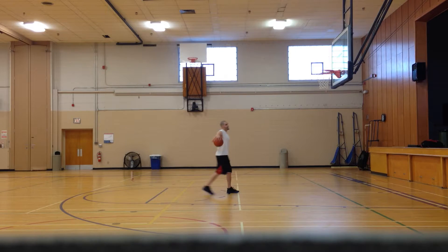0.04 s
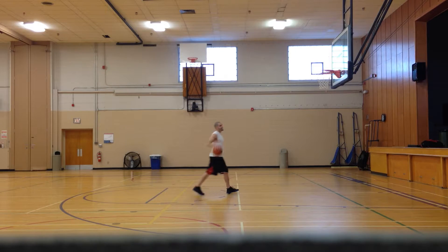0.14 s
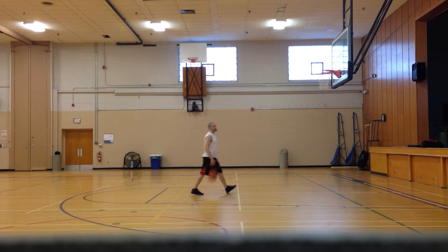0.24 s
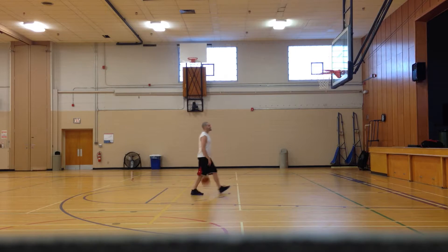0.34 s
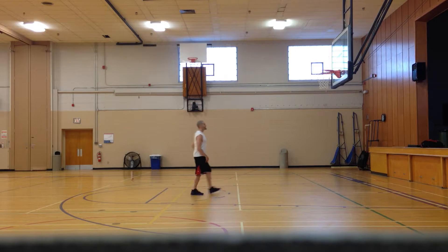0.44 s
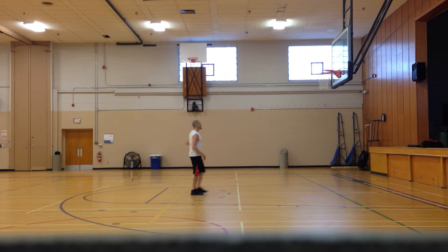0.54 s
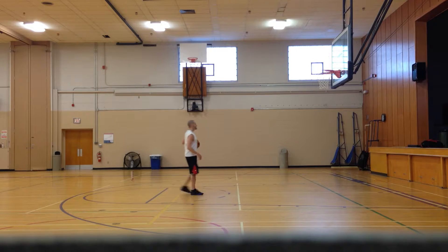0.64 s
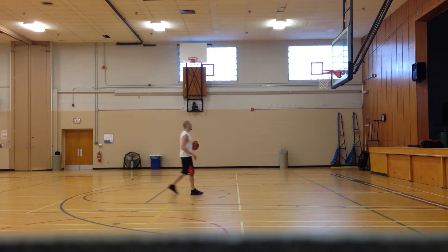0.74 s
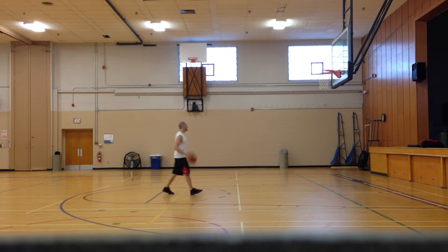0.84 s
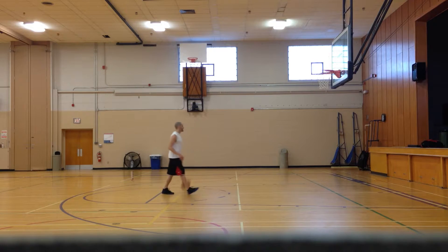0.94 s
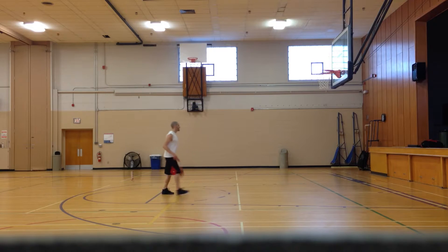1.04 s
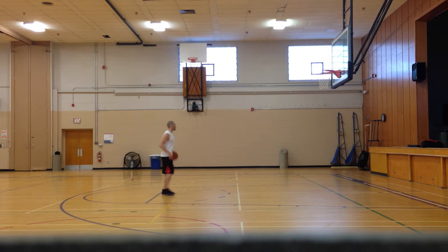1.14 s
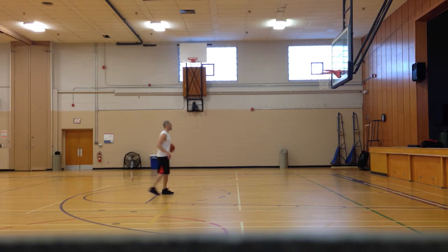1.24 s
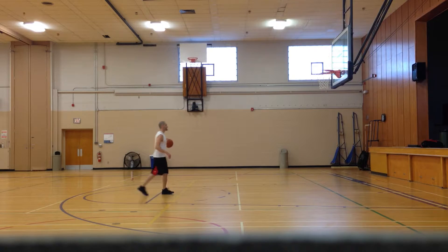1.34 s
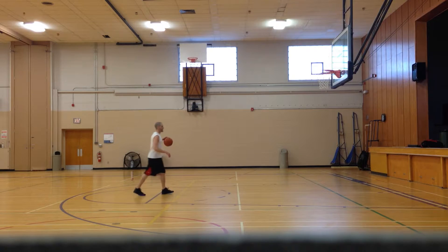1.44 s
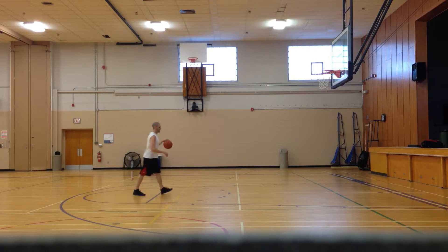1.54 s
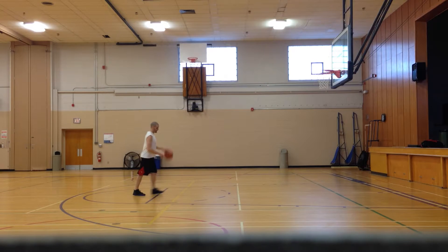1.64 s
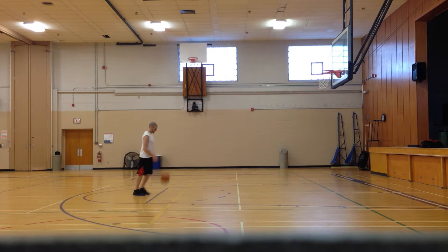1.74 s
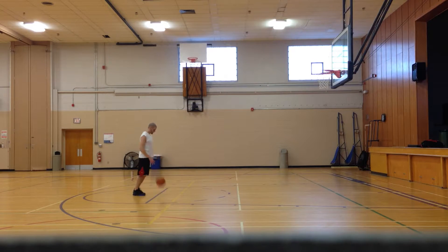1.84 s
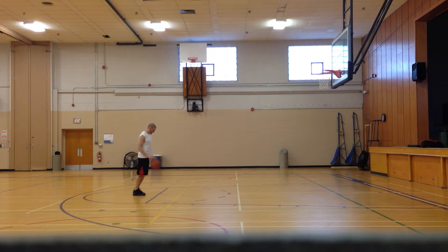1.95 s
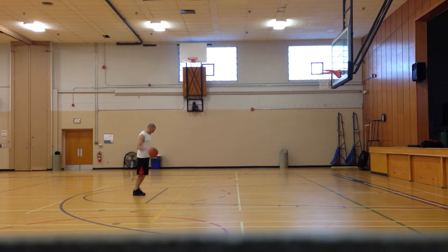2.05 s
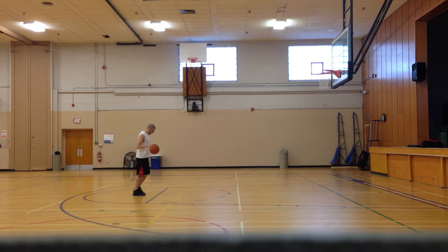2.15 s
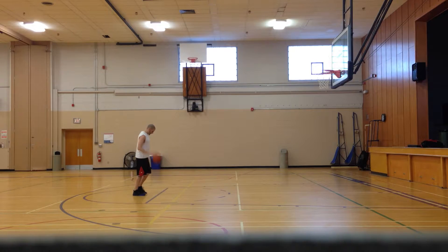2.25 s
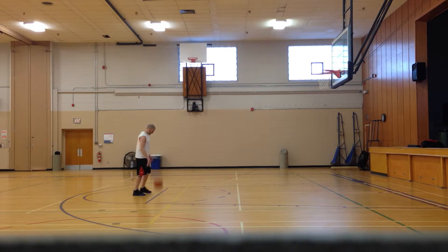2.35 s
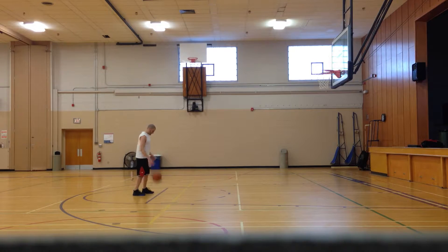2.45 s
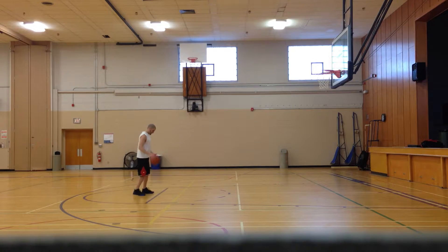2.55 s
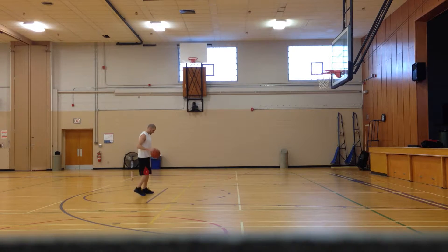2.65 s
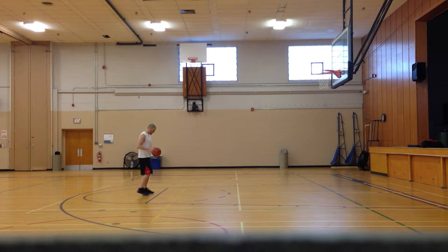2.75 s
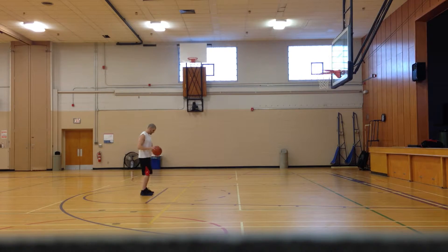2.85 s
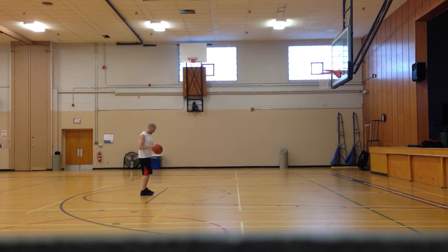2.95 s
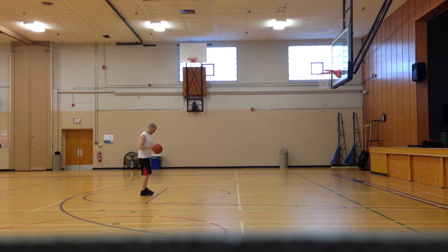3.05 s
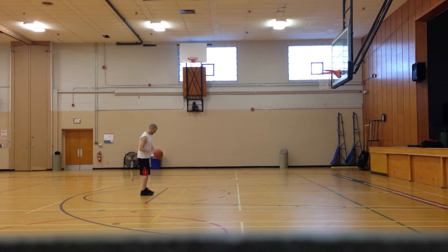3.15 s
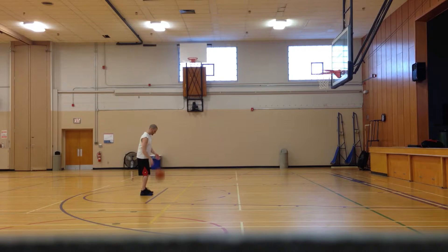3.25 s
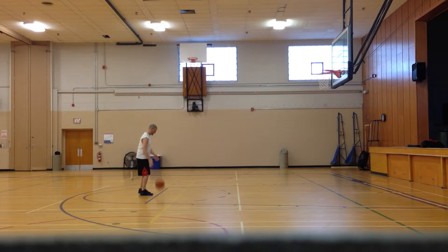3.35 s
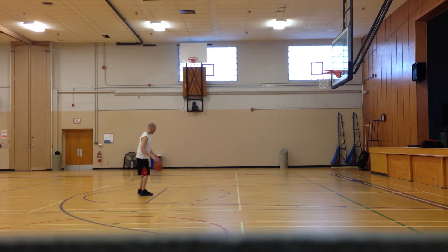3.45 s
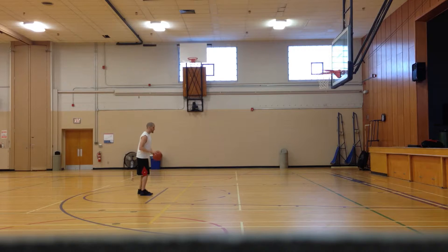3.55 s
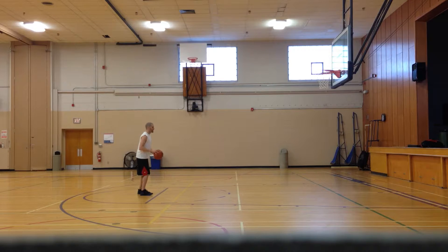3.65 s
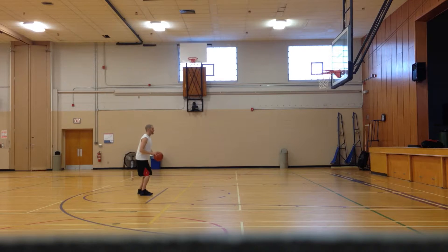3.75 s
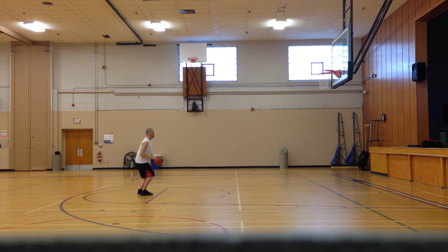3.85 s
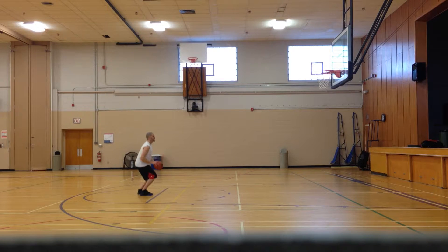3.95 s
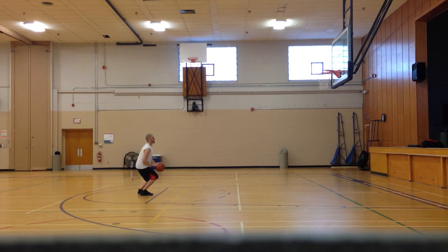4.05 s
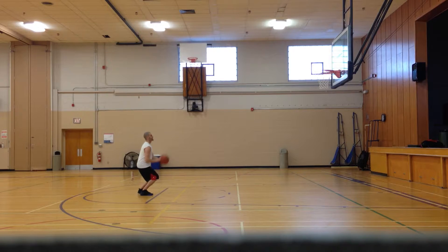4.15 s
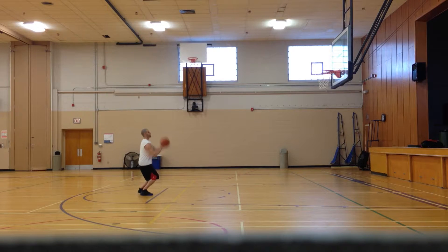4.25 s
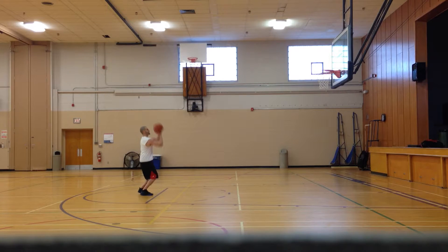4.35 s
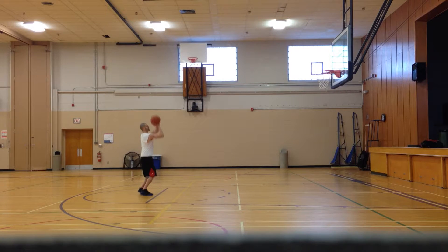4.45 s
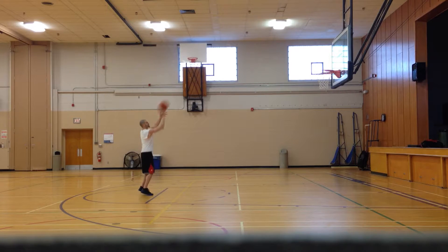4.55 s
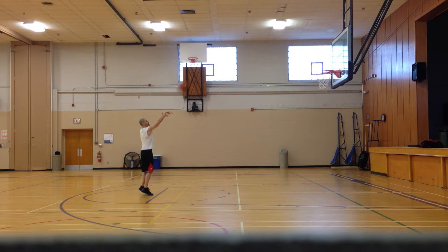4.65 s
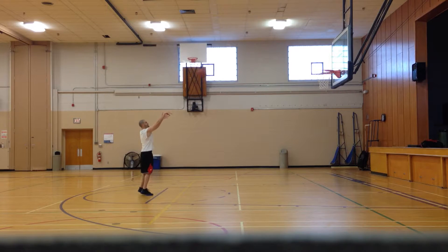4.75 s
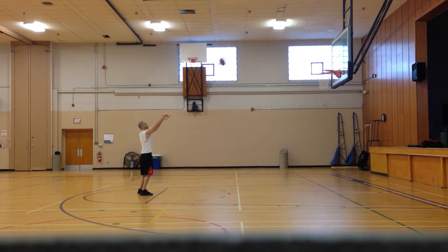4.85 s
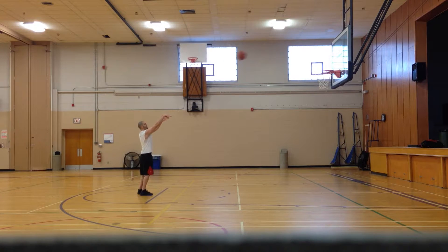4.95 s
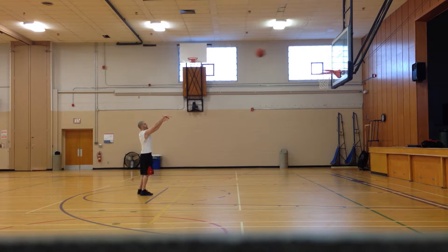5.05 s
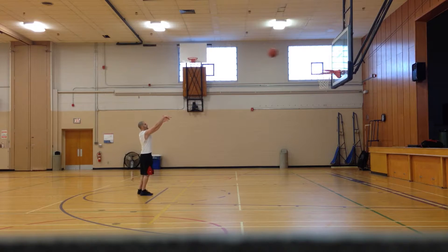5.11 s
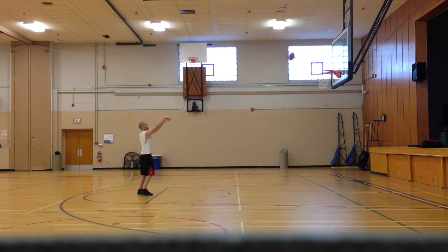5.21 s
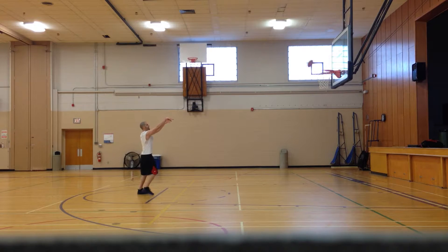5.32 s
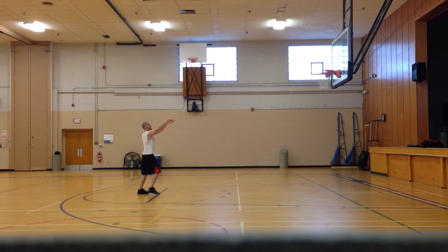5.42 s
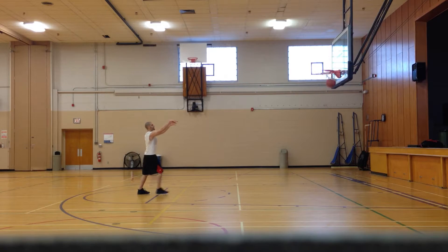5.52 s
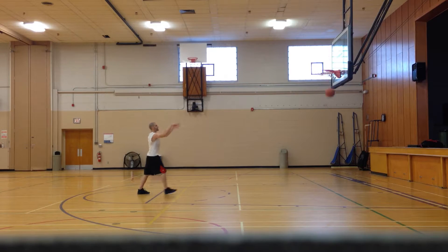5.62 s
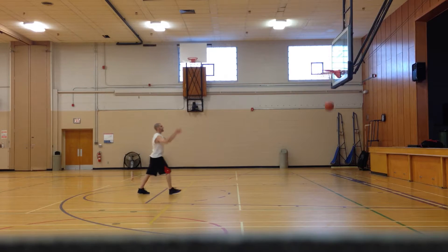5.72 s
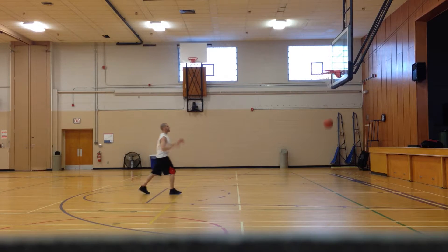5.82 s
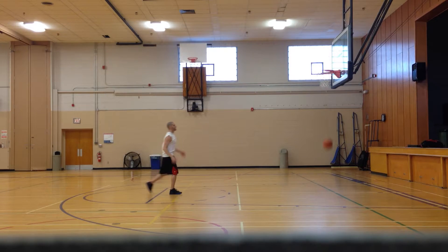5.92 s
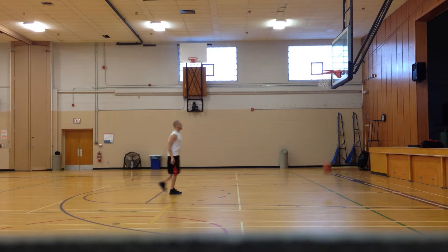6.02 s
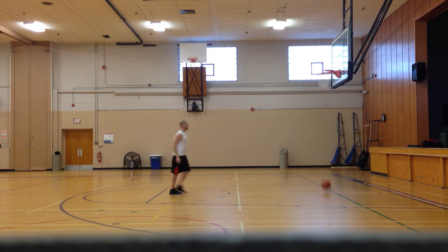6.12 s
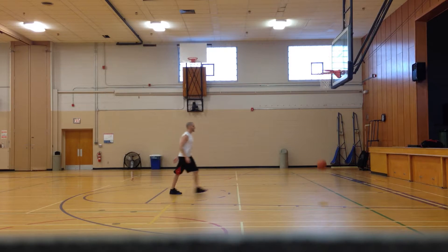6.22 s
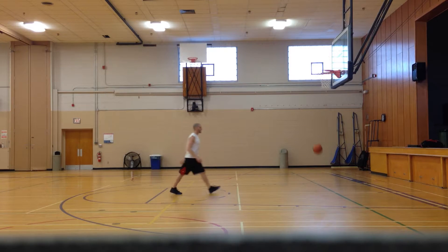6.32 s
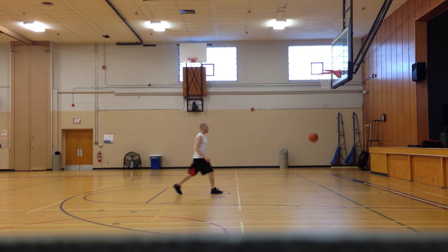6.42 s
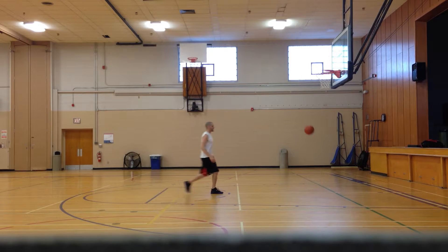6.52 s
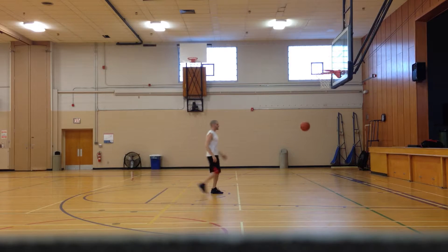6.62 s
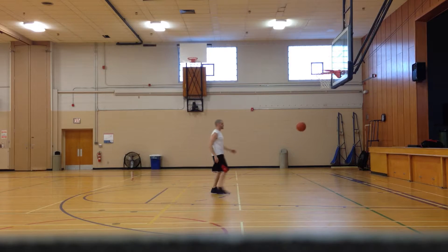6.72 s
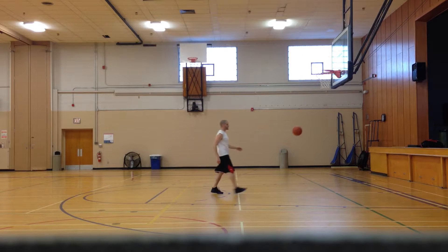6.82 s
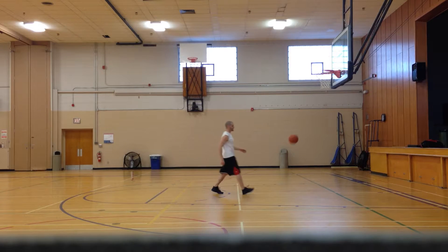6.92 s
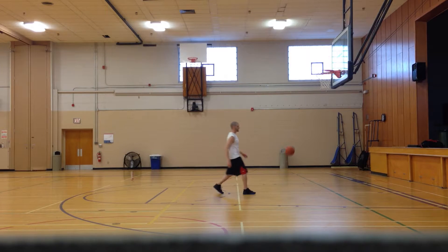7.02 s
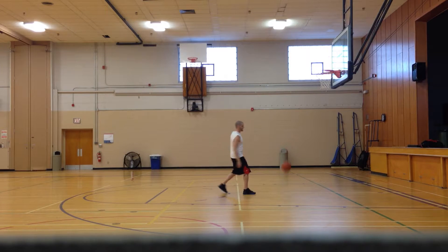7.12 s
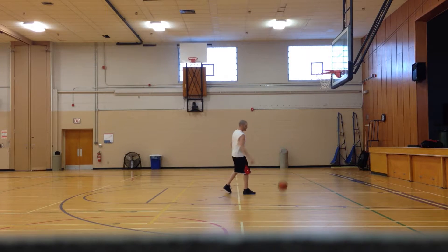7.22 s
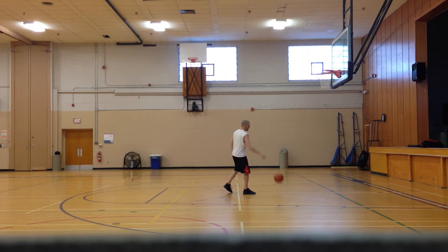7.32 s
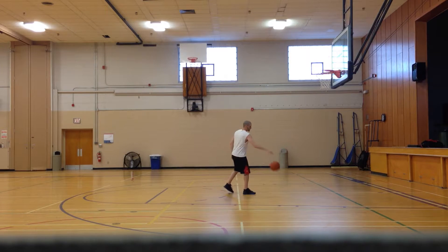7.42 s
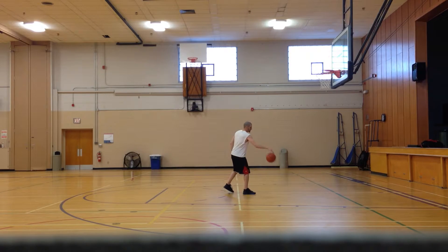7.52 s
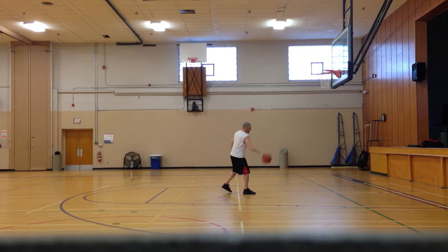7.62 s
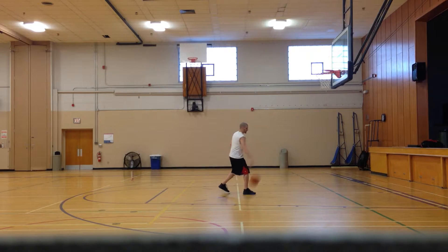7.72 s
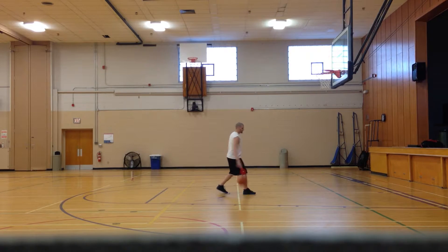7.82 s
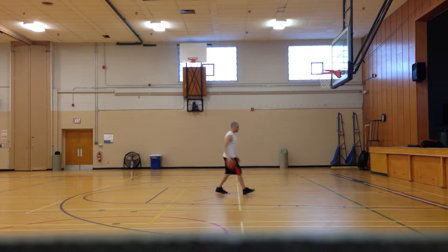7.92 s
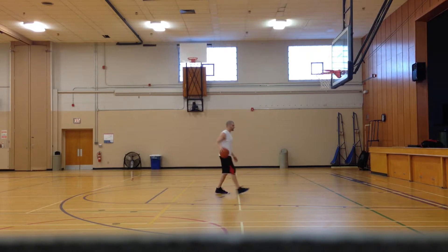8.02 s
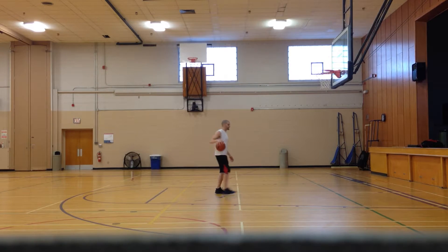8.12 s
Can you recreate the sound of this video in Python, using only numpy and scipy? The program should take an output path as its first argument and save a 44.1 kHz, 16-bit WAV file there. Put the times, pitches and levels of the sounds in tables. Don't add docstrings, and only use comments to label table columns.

```python
import sys
import numpy as np
from scipy import signal
from scipy.fft import rfft, irfft, next_fast_len
from scipy.io import wavfile
from scipy.ndimage import uniform_filter1d, map_coordinates

SR = 44100
rng = np.random.default_rng(int(sys.argv[2]) if len(sys.argv) > 2 else 0)


def volts_from_decibels(level):
    exponent = np.asarray(level, float) / 20
    return 10 ** exponent


def pcm_store(signal):
    levels = np.round(np.clip(np.atleast_2d(signal), -1, 1) * 32767)
    wavfile.write(sys.argv[1], SR, levels.astype(np.int16).T)


N = 360297

# pitch_hz, level_db (per Hz)
DUCT_AIR = [(12, -62), (25, -35), (40, -12), (60, -7), (75, -10.5), (95, -1.5), (115, -5), (150, -16),
            (300, -25), (550, -31), (800, -40), (1500, -42.5), (2500, -44.5), (5000, -56)]
# pitch_hz, level_db (rms)
FAN_TONES = [(86, -53), (97.6, -58.5), (409, -78)]
# start_s, bass_db, middle_db, top_db
EARLIER_BOUNCE = [(-0.21, -32, -36.5, -33)]
# pitch_hz, level_db (per Hz)
HALL_COLOUR = [(18, -41), (30, -21.5), (65, -1.5), (87, 2.5), (139, -15.5), (180, -13.5), (328, -26.5),
               (364, -23), (497, -30), (754, -33.5), (1170, -27.5), (1780, -30), (3980, -36.5),
               (5440, -52.5), (15000, -77.5)]
# pitch_hz, t60_s
HALL_DECAY = [(50, 1.2), (110, 2.01), (280, 1.325), (740, 1.75), (1200, 2.35), (2000, 2.28), (3500, 1.79),
              (6000, 1.84), (12000, 0.74)]
# start_s, slap_db, thump_db, tail_middle_db, tail_top_db
BOUNCES = [
    (0.4344, -6, -16.5, -28, -26.5),
    (1.0984, -12, -17, -31.5, -29.5),
    (1.9313, -8.5, -19, -31, -29),
    (2.511, -8, -15, -30, -28.5),
    (3.447, -8.5, -17.5, -28.5, -30.5),
    (6.2299, -10.5, -17, -26.5, -31),
    (7.3738, -12, -20, -32, -33),
    (7.897, -10, -19.5, -33, -28.5),
]
# stage_path_m, far_wall_path_m (both extra), far_wall_db, bass_return_db
SPOTS = [(4.97, 26.24, 1.5, -3), (5.11, 24.9, 1.5, -1.5), (5.66, 26.1, -2, -0.5), (5.66, 26.3, -2.5, -1.5),
         (5.66, 26.3, 1.5, 1), (2.93, 26.17, 3.5, 1), (3.55, 26.55, 1.5, -0.5), (4.3, 27.05, -6, 3)]
# slap_db, tail_db
CRISPNESS = [(-7.5, -3.5), (-0.5, 2.5), (-0.5, 0), (3, 2), (-1.5, 5.5), (0.5, 6.5), (-5, -1.5), (0, 1)]
# pitch_hz, level_db, t60_s
BALL_AIR = [(924, -13.5, 0.056), (1192, -7.5, 0.028), (1555, -5.5, 0.02), (2060, -33, 0.16),
            (2476, -23.5, 0.13), (3474, -15.5, 0.017), (4400, -41, 0.0038), (7350, -17.5, 0.00093)]
# level_db (against the slap), highs_kept_db, fade_db_per_m (away from the stage)
SURFACES = [(-2, -15, 0.1), (-8.5, 4.5, 0), (-8.5, -10, 1.1), (-14.5, -8, -5), (-15, 1, 1.7), (-18, -8, -5),
            (-22, -14, 3), (-16, -3.5, 1)]
# extra_path_m, shift_m_per_m (away from the stage), level_db (against the thump)
BASS_RETURNS = [(4.92, 0.015, 0), (9.58, 0.71, -0.5), (13.47, -0.19, -6.5), (16.74, 0.4, -2.5),
                (23.83, 0.42, -7.5), (28.36, 0.3, -8.5), (32.18, -0.34, -6.5), (46.25, -0.42, -13.5),
                (60.36, -1.53, -6.5), (64, -1.42, -5.5)]
# start_s, board_db, hoop_db
KNOCKS = [(5.561, -48, -40.5), (5.575, -19, -27), (5.6, -29, -37.5), (5.64, -31, -42), (5.657, -26.5, -41),
          (5.73, -30, -35.5), (5.78, -27.5, -36.5), (5.85, -30.5, -39), (5.93, -36.5, -50),
          (6.0, -39.5, -50), (6.06, -46, -60)]
# pitch_hz, width_hz, level_db
BOARD_MODES = [(320, 100, -7.5), (390, 39, -6), (422, 19, -2), (475.5, 44, -0.5)]
# pitch_hz, width_hz, level_db
HOOP_MODES = [(610, 150, -7), (935, 240, -2), (1240, 160, -1), (1455, 140, -2.5), (1860, 350, -6),
              (2430, 240, -4.5), (3250, 640, -7.5), (4070, 940, -9), (5760, 1800, -20)]
# pitch_hz, level_db (per Hz)
NET_COLOUR = [(500, -33), (1200, 0), (3000, 2), (6000, -2), (9000, -11.5), (13000, -7), (16000, -16)]


def seconds(length):
    return np.arange(round(length * SR)) / SR


def unit(x):
    return x / np.sqrt(np.mean(x ** 2) + 1e-20)


def along(points, hz):
    f, v = np.transpose(points)
    return np.interp(np.log(hz + 1), np.log(f + 1), v)


def filtered(x, response):
    m = next_fast_len(len(x) + SR // 2)
    return irfft(rfft(x, m) * response(np.fft.rfftfreq(m, 1 / SR)), m)[:len(x)]


def wobble(rate):
    knots = rng.standard_normal(100)
    return map_coordinates(knots, [np.arange(N) * rate / SR], order=2)


def add(out, sound, s):
    start = round(s * SR)
    part = sound[max(-start, 0):][:len(out) - max(start, 0)]
    out[max(start, 0):][:len(part)] += part


def ventilation():
    t = np.arange(N) / SR
    rush = unit(filtered(rng.standard_normal(N), lambda hz: volts_from_decibels(along(DUCT_AIR, hz))))
    air = volts_from_decibels(-49.0 + 2.4 * wobble(5.8)) * rush
    tones = np.zeros(N)
    for hz, db in FAN_TONES:
        level = volts_from_decibels(db + 4.5 + 1.5 * wobble(2.45))
        tones += level * np.sin(2 * np.pi * hz * t + 0.81 * wobble(4))
    return air + tones


def ringing(colour_db):
    hz, t, z = signal.stft(rng.standard_normal(2 * SR), SR, nperseg=1024)
    lumps = uniform_filter1d(rng.standard_normal(z.shape), size=4, axis=0)
    lumps = unit(uniform_filter1d(lumps, size=2, axis=1))
    body_and_sizzle = ((hz < 2500) | (hz > 4800))[:, None]
    early_db = 4 * lumps * volts_from_decibels(-60 * t / 3.2) + 5 * volts_from_decibels(-60 * t / .5) * body_and_sizzle
    decay_db = colour_db(hz)[:, None] - 60 * t / along(HALL_DECAY, hz)[:, None] + early_db
    split = np.array([hz < 300, hz >= 300])[..., None]
    bass, treble = signal.istft(z * volts_from_decibels(decay_db) * split, SR, nperseg=1024)[1]
    t = np.arange(len(bass)) / SR
    flutter_db = (6 - 17 * (t / .0765 % 1)) * volts_from_decibels(-60 * t / 0.68)
    return bass * (1 - np.exp(-t / 0.043)) + treble * volts_from_decibels(flutter_db) * (1 - np.exp(-t / 0.0053))


def forerunner():
    t = seconds(.012)
    band = signal.butter(1, [2300, 3300], "band", fs=SR)
    return t / 0.01 * unit(signal.lfilter(*band, rng.standard_normal(len(t))))


def thump():
    t = seconds(.02) - .005
    dip = -.55 * np.minimum(t / 0.0069 + 1, 1) ** 2 * np.exp(-np.maximum(t, 0) / 0.00071)
    squash = np.sin(2 * np.pi * 118 * t) * (t > 0) * (t < 1 / 118)
    return dip + squash


def slap(ring_db, grit_db):
    t = seconds(.03)
    spike = -np.exp(-.5 * ((t - .0003) / .000038) ** 2)
    spike = spike + 0.18 * np.roll(spike, shift=28)
    late = np.maximum(t - .0003, 0)
    scatter = rng.normal(0, [4, .05], (len(BALL_AIR), 2))
    ring = np.zeros(len(t))
    for (hz, db, t60), (more_db, sharper) in zip(BALL_AIR, scatter):
        ring += volts_from_decibels(db + more_db - 60 * late / t60) * np.sin(2 * np.pi * hz * (1 + sharper) * late)
    scuff = np.convolve(rng.standard_normal(len(t)), [.5, 1, .5], "same") * (late > 0)
    return spike + volts_from_decibels(ring_db) * ring + volts_from_decibels(grit_db - 60 * late / 0.01) * scuff


def crisp(sound, snap_db):
    lows = signal.filtfilt(*signal.butter(2, 6000, fs=SR), sound)
    return lows + volts_from_decibels(snap_db) * (sound - lows)


def wall(sound, delay, highs_db):
    t = seconds(.01)
    facets = (0.16 + 3.9 * delay) * volts_from_decibels(-60 * t / (0.0013 + 0.12 * delay)) * rng.standard_normal(len(t))
    facets[0] = 1
    smeared = np.convolve(sound, facets / np.linalg.norm(facets))
    lows = signal.filtfilt(*signal.butter(2, 5000, fs=SR), smeared)
    return lows + volts_from_decibels(highs_db) * (smeared - lows)


def hall_tail(bass_db, middle_db, top_db, snap_db):
    tilt = [(120, bass_db + 27), (300, middle_db + 33.0), (1200, middle_db + 30.5),
            (2900, top_db + 28.5), (4000, top_db + 28.0), (7000, top_db + 30 + snap_db)]
    return ringing(lambda hz: along(HALL_COLOUR, hz) + along(tilt, hz))


def ball():
    sound_m_s = 343
    ceiling, end, ledge = 5.05, 15.7, 1.85
    out, low = np.zeros(N), np.zeros(N)
    s, *earlier_db = EARLIER_BOUNCE[0]
    add(out, hall_tail(*earlier_db, 0), s)
    for bounce, spot, (snap_db, tail_snap_db) in zip(BOUNCES, SPOTS, CRISPNESS):
        s, slap_db, thump_db, middle_db, top_db = bounce
        stage, far, far_db, bass_return_db = spot
        away = stage - 4.5
        add(out, volts_from_decibels(slap_db) * crisp(slap(ring_db=-12.5, grit_db=-29), snap_db), s - .0003)
        add(out, volts_from_decibels(thump_db) * thump(), s - .005)
        add(out, volts_from_decibels(slap_db - 42.5) * forerunner(), s - .0122)
        paths = [ceiling, stage, stage + ceiling, end - 0.3 * away,
                 far, far + ledge, far + ceiling, 2 * far]
        for path, (loss_db, highs_db, fade_db) in zip(paths, SURFACES):
            delay = path / sound_m_s
            dull_db = 5 * away * (path == stage)
            kept_db = highs_db - 0.7 + 0.51 * snap_db - dull_db
            echo = wall(slap(ring_db=-6, grit_db=-27), delay, kept_db)
            echo_db = slap_db + loss_db - 3.5 + fade_db * away + far_db * (path >= far)
            add(out, volts_from_decibels(echo_db) * echo, s + delay - .0003)
        for path, shift, loss_db in BASS_RETURNS:
            boom = volts_from_decibels(thump_db + loss_db + bass_return_db - 2.5) * thump()
            add(low, boom, s + (path + shift * away) / sound_m_s - .005)
        add(out, hall_tail(thump_db - 10, middle_db, top_db, tail_snap_db), s)
    return out + filtered(low, lambda hz: 1 / (1 + (hz / 350) ** 4))


def fading(s, db, t60):
    t = np.maximum(np.arange(N) / SR - s, 0)
    return volts_from_decibels(db - 60 * t / t60) * (1 - np.exp(-t / 0.0025))


def resonant(x, modes):
    def response(f):
        total = 0
        for k, (hz, width, db) in enumerate(modes):
            total = total + (-1) ** k * volts_from_decibels(db) * 1j * f * width / (hz * hz - f * f + 1j * f * width)
        return total
    return filtered(x, response)


def bracket(hit_s):
    t = np.arange(N) / SR
    song = np.zeros(N)
    for s, db, _ in KNOCKS:
        pitch_hz = 492 - 143 * (s - hit_s)
        for share, under_db in [(1, 0), (.71, -9.5)]:
            tone = np.sin(2 * np.pi * share * pitch_hz * (t - s))
            song += fading(s, db - 3.5 + under_db, .14) * tone
    return song


def hoop():
    hit_s = 5.575
    board = fading(hit_s, -42, 1.6)
    steel, blows = np.zeros(N), np.zeros(N)
    for s, board_db, hoop_db in KNOCKS:
        board += fading(s, board_db, .1)
        steel += fading(s, hoop_db, .16)
        add(blows, volts_from_decibels([board_db + 34.5]), s)
    panel = resonant(volts_from_decibels(13) * board * rng.standard_normal(N) + volts_from_decibels(2) * blows, BOARD_MODES)
    clang = panel + resonant(volts_from_decibels(9) * steel * rng.standard_normal(N), HOOP_MODES)
    song = bracket(hit_s)
    brush = fading(hit_s, -38.5, 0.079) + fading(hit_s, -47, 0.41)
    net = brush * unit(filtered(rng.standard_normal(N), lambda hz: volts_from_decibels(along(NET_COLOUR, hz))))
    tail = ringing(lambda hz: along([(3000, -2.0), (12000, -21.5)], hz))
    answer = signal.fftconvolve(clang + .3 * song + net, tail / np.linalg.norm(tail))[:N]
    return clang + song + net + volts_from_decibels(-4.5) * answer


def scene():
    return (ventilation() + ball() + hoop())[None]


def top_cut(x):
    return signal.sosfilt(signal.butter(12, 16430, fs=SR, output="sos"), x)


def record(dry):
    hiss = volts_from_decibels(-68.5) * rng.standard_normal(N)
    mix = filtered(dry[0] + hiss, lambda hz: (hz < 15650) * 1j * hz / (32 + 1j * hz))[None]
    return top_cut(mix)


dry = scene()
out = record(dry)
pcm_store(out)
```